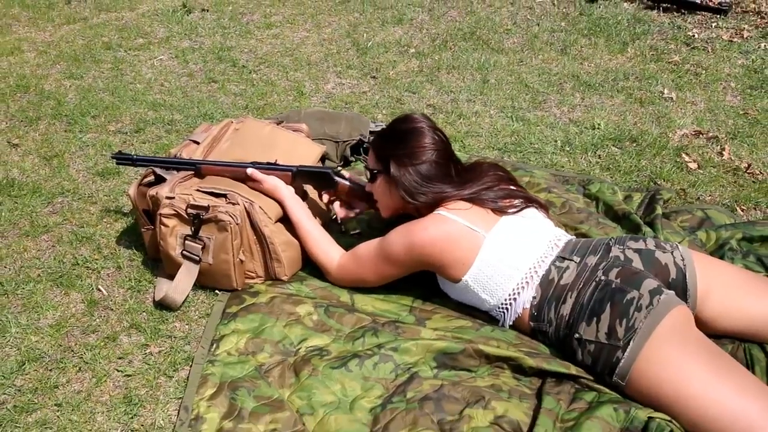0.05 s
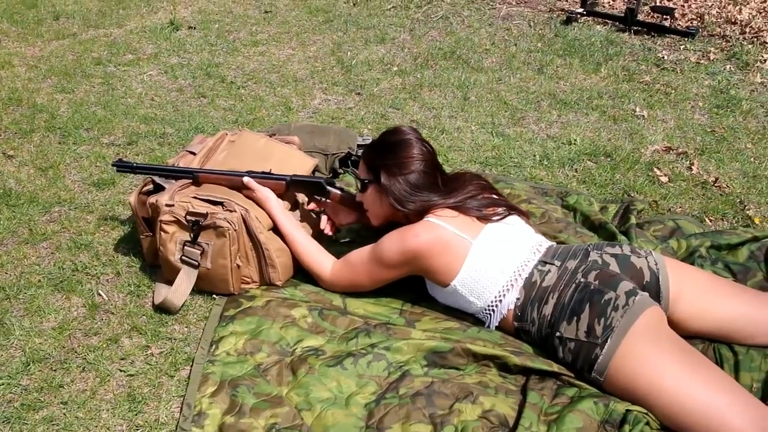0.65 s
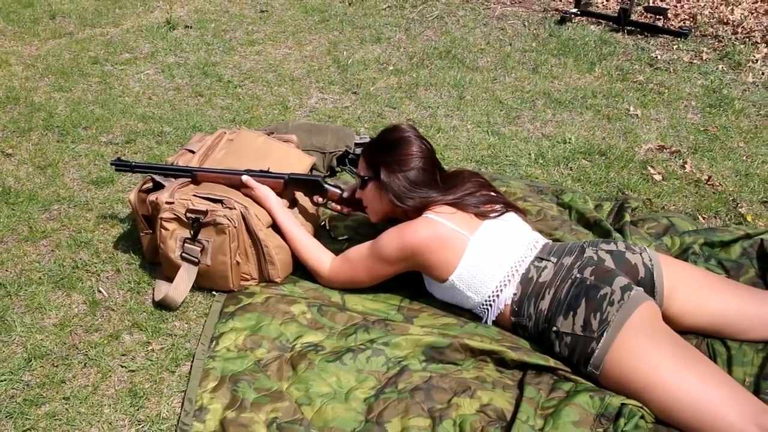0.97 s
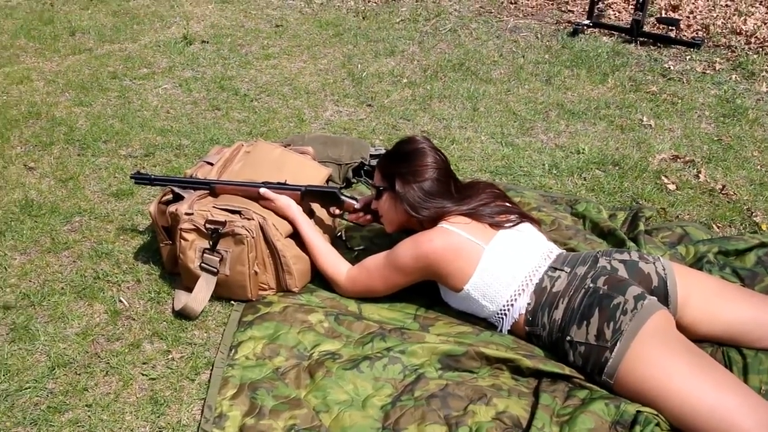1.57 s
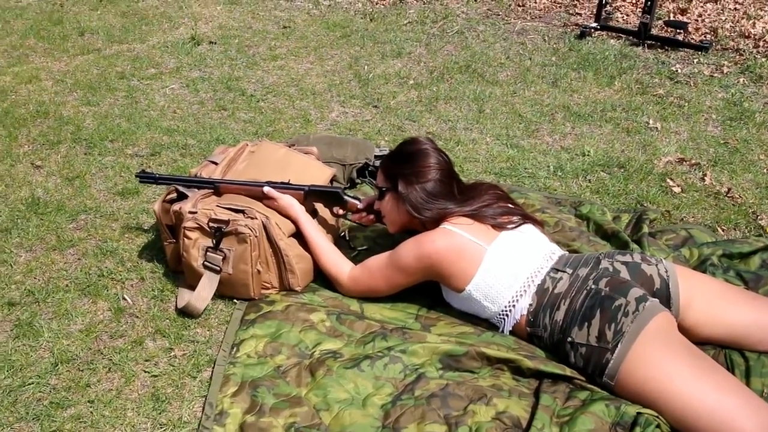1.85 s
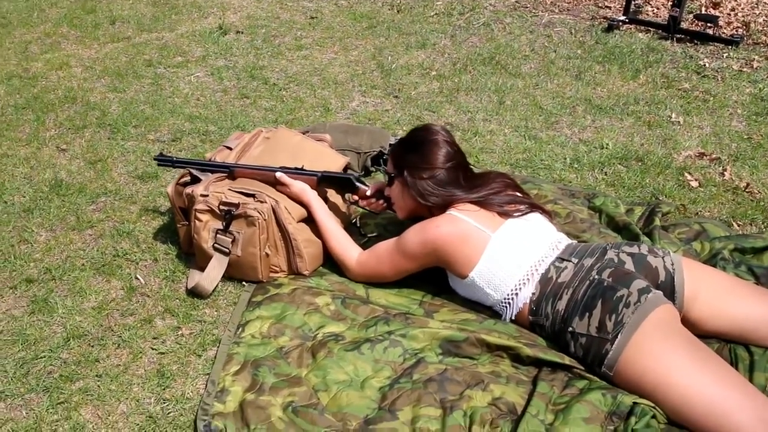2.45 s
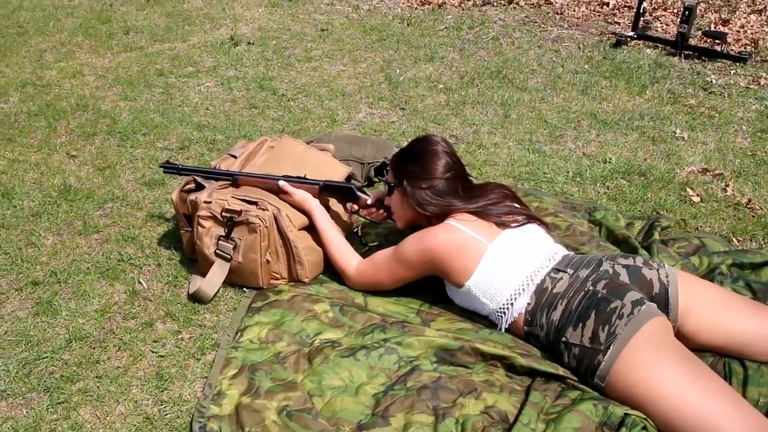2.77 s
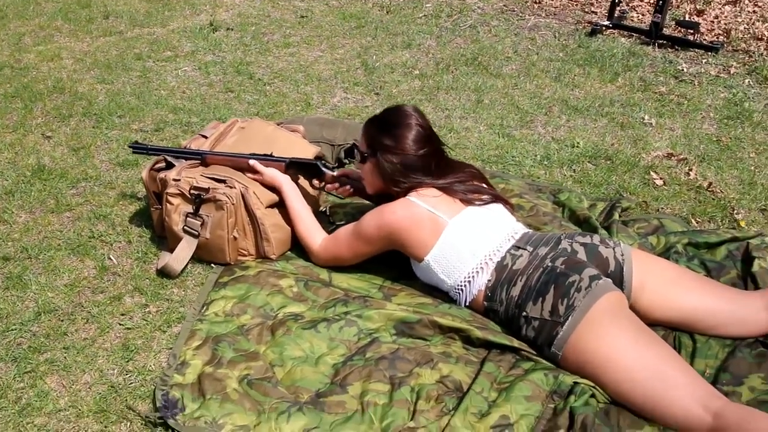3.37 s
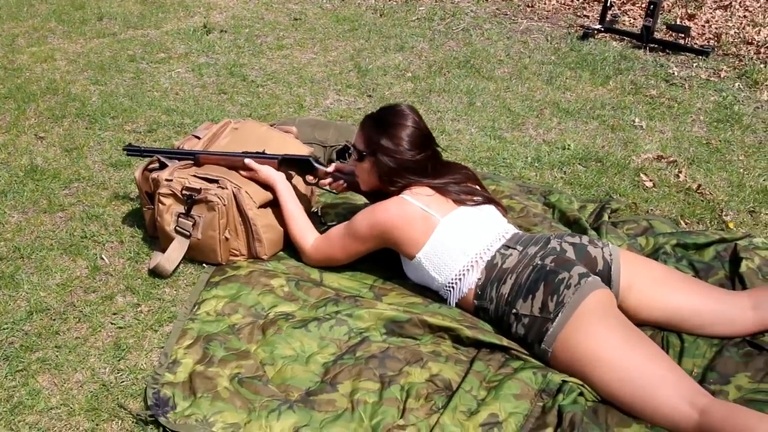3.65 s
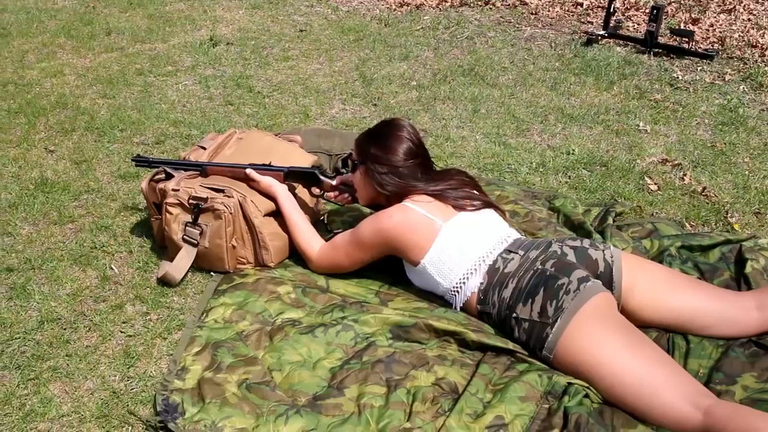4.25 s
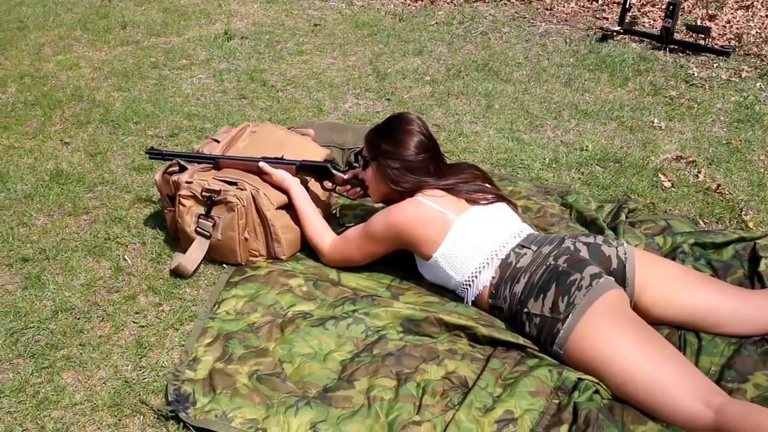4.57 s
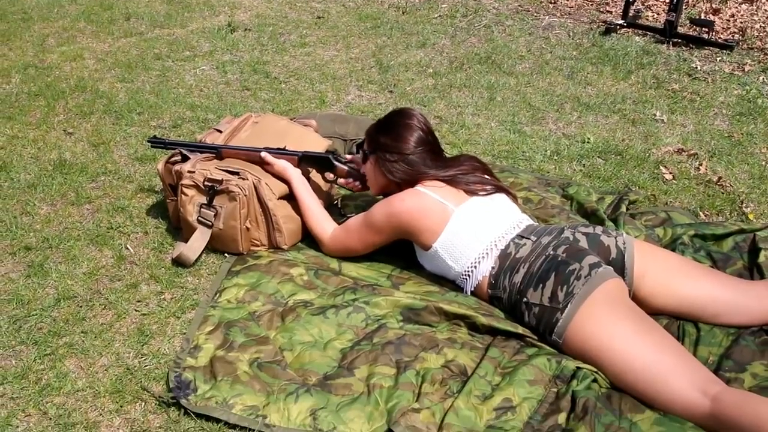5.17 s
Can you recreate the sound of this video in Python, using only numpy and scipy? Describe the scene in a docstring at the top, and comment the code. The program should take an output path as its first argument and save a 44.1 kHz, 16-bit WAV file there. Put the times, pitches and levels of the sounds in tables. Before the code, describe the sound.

Outdoors on an open field, two quick bursts of close steel clicking and sliding come as a rifle's lever is opened and closed, with the thin ring of an ejected casing. About a second later the rifle fires once, a sharp, slightly distorted blast followed by a rolling echo. Then only light handling, quiet outdoor air and a far engine's low hum are heard.

```python
"""First come the steel clacks of a lever-action rifle being worked close by, and the ping of its spent case.
Then one shot cracks across an open lawn. The blast overloads the microphone; a limiter turns the level
down and slowly back up while the echo rolls in from the trees, ever duller.
Behind it all, a far engine hums under the outdoor air, and a ground sheet rustles now and then."""
import sys
import numpy as np
from scipy import signal
from scipy.fft import rfft, irfft
from scipy.io import wavfile
from scipy.ndimage import uniform_filter1d

SR = 44100
rng = np.random.default_rng(int(sys.argv[2]) if len(sys.argv) > 2 else 0)


def dump(signal):
    """Clip the signal to [-1, 1] and save it as 16-bit WAV at the path in sys.argv[1]."""
    limited = np.clip(np.atleast_2d(signal).T, -1, 1)
    pcm = np.round(limited * 32767).astype(np.int16)
    wavfile.write(sys.argv[1], SR, pcm)


N = 229716
T = np.arange(N) / SR
FREQS = np.fft.rfftfreq(N, 1 / SR)
SHOT_S = 2.0662


def amp(db):
    """Turns decibels into a gain."""
    return 10 ** (np.asarray(db) / 20)


def unit(x):
    """Scales a signal to an average (rms) level of 1."""
    return x / np.sqrt(np.mean(x ** 2) + 1e-20)


def tone_curve(points):
    """Joins points of Hz and dB into a gain for every frequency."""
    hz, db = np.transpose(points)
    return amp(np.interp(np.log(FREQS + 1), np.log(hz + 1), db))


def band(x, lo_hz, hi_hz, order=2):
    """Keeps the sound between two frequencies."""
    return signal.sosfilt(signal.butter(order, [lo_hz, hi_hz], "band", fs=SR, output="sos"), x)


def noise(gains):
    """Noise shaped by a gain for every frequency."""
    return unit(irfft(rfft(rng.standard_normal(N)) * gains, N))


def drift(rate_hz):
    """Smooth random wandering."""
    return noise(np.exp(-(FREQS / rate_hz) ** 2))


def bell(t, middle, width):
    """A smooth rise and fall of height 1."""
    return np.exp(-.5 * ((t - middle) / width) ** 2)


def swell(s, width, db, hz, octaves):
    """Noise around one pitch that fades in and out."""
    return amp(db) * bell(T, s, width) * noise(bell(np.log2((FREQS + 1) / hz), 0, octaves))


def add(mix, s, sound):
    """Mixes a sound in at s seconds."""
    part = mix[round(s * SR):][:len(sound)]
    part += sound[:len(part)]


# The tone of the air and hiss. Each row: frequency in Hz, relative level in dB.
AIR_TONE = [(12, -43), (20, -2), (38, -8.5), (127, -4), (204, -14.5), (241, -13.5), (293, -16), (357, -20),
            (698, -21.5), (1000, -19.5), (1190, -24), (2260, -31), (5530, -36), (14700, -36), (16000, -46)]

def outdoor_air(level_db=-47.5, swell_db=0.67, hiss_hz=3600):
    """Low down, the air is alike left and right; higher up, each microphone side adds its own hiss."""
    alike = 1 / (1 + (FREQS / hiss_hz) ** 3)
    spectra = rfft(rng.standard_normal((2, N))) * tone_curve(AIR_TONE)
    mid, side = spectra * np.sqrt([1 + alike, 1 - alike])
    return amp(level_db + swell_db * drift(2)) * unit(irfft([mid + side, mid - side], N))


# The main exhaust tone. Each row: time in seconds, level in dB.
EXHAUST_LEVELS = [(0, -41), (0.7, -40.5), (1.0, -48.5), (2.0, -44), (3.0, -48), (3.7, -46.5), (4.0, -52.5),
                  (4.68, -50), (4.95, -38.5), (5.21, -45)]
# The engine's fainter, fluttering tones. Each row: multiple of its cycle rate, level in dB.
ENGINE_TONES = [(4, -54), (5, -59.5), (8, -63.5), (12, -65), (18, -67), (24, -70.5), (48, -67)]

def far_engine(start_hz=20.27, steady_hz=20.77, settle_s=1.1, waver=0.0041, flutter_db=4.5):
    """An engine settles to a steady speed; its low tones waver on their way through the air."""
    cycle_hz = steady_hz + (start_hz - steady_hz) * np.exp(-T / settle_s)
    phase = 2 * np.pi * np.cumsum(cycle_hz * (1 + waver * drift(5.5))) / SR
    main_db = np.interp(T, *np.transpose(EXHAUST_LEVELS)) + 1.2 * drift(8)
    others = sum(amp(db + flutter_db * drift(4.3)) * np.sin(multiple * phase + drift(4))
                 for multiple, db in ENGINE_TONES)
    return np.sqrt(2) * (amp(main_db) * np.sin(6 * phase) + others)


# Cloth and ground sheet. Each row: middle and width in seconds, level in dB, pitch in Hz.
CLOTH_RUSTLES = [(0.62, 0.11, -60, 2610), (1.346, 0.2, -57, 1010), (1.422, 0.009, -47, 1080),
                 (1.922, 0.063, -57.5, 3300), (3.583, 0.042, -54, 4700), (3.715, 0.034, -54, 5170)]
# Soft low thumps, mostly bumps on the microphone.
# Each row: middle and width in seconds, level in dB, pitch in Hz.
LOW_BUMPS = [(0.277, 0.0089, -29, 190), (1.03, 0.033, -46, 36), (4.055, 0.028, -37, 49.5)]
# Fingers and clothing touch the rifle. Each row: time in seconds, level in dB, pitch in Hz.
FINGER_TAPS = [(0.435, -38.5, 823), (1.852, -52, 4460), (1.899, -44.5, 2440), (3.3, -56.5, 5000),
               (3.397, -49.5, 4500), (3.447, -53, 4500), (4.461, -51, 2000), (4.78, -51, 1600)]

def handling(crinkle_db=1.5, tap_s=0.0024):
    """Cloth crinkles, the microphone is bumped and fingers tap the rifle."""
    cloth = sum(swell(*row, octaves=0.87) for row in CLOTH_RUSTLES)
    bumps = sum(swell(*row, octaves=0.51) for row in LOW_BUMPS)
    taps = sum(swell(s, tap_s, db, hz, octaves=0.68) for s, db, hz in FINGER_TAPS)
    return cloth * unit(amp(crinkle_db * drift(60))) + bumps + taps


# A small loose part. Each row: pitch in Hz, level in dB, seconds to fade by 60 dB.
TINK_TONES = [(3080, -36.5, 0.018), (4330, -40, 0.022), (4800, -42, 0.018)]

def tink(start_s=4.018):
    """One light touch of metal on metal."""
    t = np.maximum(T - start_s, 0)
    return sum(amp(db - 60 * t / fade_s) * np.sin(2 * np.pi * hz * t) for hz, db, fade_s in TINK_TONES)


# The brass case's tones. Each row: pitch in Hz, relative level in dB, seconds to fade by 60 dB.
CASE_TONES = [(5420, 1, 0.33), (12730, -6, 0.18), (12828, -2.5, .19), (15722, 2.5, .15)]
# The case flies out and lands. Each row: start in seconds, level in dB,
# extra dB for the two middle tones, extra dB for the top tone.
CASE_HITS = [(0.283, -32, -11, 0), (0.3065, -30.5, -15, -5), (0.899, -34.5, 3, -11),
             (0.917, -50.5, 21, -10)]

def spent_case(rise_s=0.0038, spin_hz=38, spin_depth=0.24):
    """The thin tube rings and wavers as it tumbles; where it is struck decides which tones ring."""
    out, t = np.zeros(N), T[:SR // 2]
    tumble = (1 - np.exp(-t / rise_s)) * (1 - spin_depth * np.cos(2 * np.pi * spin_hz * t))
    for s, db, middle_db, top_db in CASE_HITS:
        for (hz, tone_db, fade_s), extra_db in zip(CASE_TONES, (0, middle_db, middle_db, top_db)):
            fade = amp(db + tone_db + extra_db - 60 * t / fade_s)
            add(out, s, tumble * fade * np.sin(2 * np.pi * hz * t))
    return out


# The bolt slides. Each row: middle and width in seconds, scrape level in dB, rattle level in dB.
BOLT_SLIDES = [(0.143, .003, -33.5, -25.5), (0.217, 0.032, -47, -34), (0.283, 0.017, -35.5, -19.5),
               (0.6, 0.028, -42.5, -27.5), (0.667, 0.011, -39.5, -26.5), (0.743, 0.015, -52, -48)]

def scrape_strength(grain_db=5):
    """The bolt catches and slips along its rails."""
    sliding = sum(amp(db) * bell(T, s, width) for s, width, db, _ in BOLT_SLIDES)
    return sliding * unit(amp(grain_db * drift(250)))


def rattle_knocks(per_second=140, spread_db=5, thud_db=-11, treble_db=-6):
    """Lists the small, uneven knocks of loose parts shaken by the sliding bolt."""
    jitter, chance = rng.standard_normal((2, 400))
    times = np.maximum(np.arange(len(jitter)) + .25 * jitter, 0) / per_second
    strength = sum(amp(db) * bell(times, s, width) for s, width, _, db in BOLT_SLIDES)
    levels = 20 * np.log10(strength + 1e-9) + spread_db * chance
    return [(s, db, thud_db, treble_db) for s, db in zip(times, levels) if db > -55]


# Lever, bolt and hammer strike. Each row: time in seconds, level in dB,
# extra dB for the low thud, extra dB for the treble.
MAIN_KNOCKS = [(0.1362, -21, -17, 11), (0.148, -14, -6.5, 8.5), (0.1523, -4.5, -13, -4.5),
               (0.1867, -21, -24, 3), (0.1945, -25.5, -24, -13), (0.231, -21.5, -20, -6),
               (0.2627, -16, -22, 5), (0.27, -11.5, -7.5, -6), (0.299, -14.5, -20.5, -11),
               (0.3056, -20, -24, 10), (0.3599, -21, -1, 1), (0.377, -25.5, -0.5, -20),
               (0.5316, -20, -21, -13.5), (0.563, -27, -11, -18.5), (0.582, -16.5, -11, -11.5),
               (0.6135, -22, -22.5, -10), (0.6201, -17, -19, -2.5), (0.654, -25.5, -11, -2.5),
               (0.659, -16, -20, -20), (0.6722, -11, -20, -21.5), (0.707, -34.5, -21, 12),
               (0.7198, -10.5, -16, -7), (0.7997, -8, -25, -4), (0.809, -11, -9, -1.5),
               (0.8158, -7.5, -20.5, -6), (0.826, -4, -13, -1), (0.8383, -4, -25.5, -1),
               (0.8985, -38, -18, 4), (0.916, -35, -16, -2), (2.0578, -19, -5.5, 1)]

def steel_chatter(rise_s=0.00065, decay_s=.0021, lead_in_s=0.0018, rebound_s=0.0057):
    """Steel parts scrape for a moment, strike, then bounce once, weaker and duller."""
    power = np.outer([0, 1, amp(-9)], scrape_strength()) ** 2  # low, middle and high bands
    early_s = .015  # room for the scrape before each strike
    t = T[:SR // 16] - early_s
    after = np.maximum(t, 0)
    strike = (1 - np.exp(-after / rise_s)) * np.exp(-after / decay_s)
    blow = strike + amp(-16) * np.exp(-abs(t) / lead_in_s)
    rebounds = [(s + rebound_s, db - 13, thud, treble - 6) for s, db, thud, treble in MAIN_KNOCKS]
    for s, db, thud_db, treble_db in MAIN_KNOCKS + rebounds + rattle_knocks():
        for track, extra_db in zip(power, (thud_db, 0, treble_db)):
            add(track, s - early_s, (amp(db + extra_db) * blow) ** 2)
    thud, clack, tick = np.sqrt(power) * rng.standard_normal((3, N))
    return (amp(12.5) * band(thud, 280, 1000)
            + amp(10) * band(clack, 1200, 4120, order=3)
            + amp(4.5) * band(tick, 5500, 14000))


# The rifle's steel body. Each row: pitch in Hz, width in Hz (wider dies sooner), relative level in dB.
STEEL_TONES = [(780, 133, -1.5), (1190, 120, -9.5), (1540, 54, -9.5), (1930, 83, -6.5), (2260, 190, -7.5),
               (2560, 92, -3), (3054, 190, -3), (3660, 370, -5), (5760, 150, -0.5), (6630, 120, -6.5),
               (7400, 15, -5.5), (7900, 45, -7.5), (9400, 199, -10), (10500, 80, -8.5), (11920, 140, -13.5),
               (14400, 180, -12)]

def lever_action(ring_db=2, direct_db=-4, tail_db=-31, tail_s=0.67):
    """The chatter rings the rifle's body; the lawn and nearby things scatter a little back."""
    t = T[:SR // 16]
    chatter = steel_chatter()
    ring = sum(amp(db) * 2 * np.pi * width / SR * np.exp(-np.pi * width * t) * np.cos(2 * np.pi * hz * t)
               for hz, width, db in STEEL_TONES)
    near = amp(direct_db) * chatter + amp(ring_db) * signal.oaconvolve(chatter, ring)[:N]
    scatter = band(rng.standard_normal(SR) * amp(-60 * T[:SR] / tail_s), 900, 4200, order=1)
    return near + amp(tail_db) * signal.oaconvolve(near, scatter / np.linalg.norm(scatter))[:N]


# The blast bounces off nearby things. Each row: arrival in seconds, peak level in dB.
NEAR_ECHOES = [(2.093, 5), (2.0988, 4), (2.1079, 7), (2.1108, 5.5), (2.121, 8), (2.13, 4.5), (2.15, 5),
               (2.181, 2)]

def slaps(width_s=.00006, early_s=.01):
    """Each nearby echo is one push and one pull of the air."""
    out = np.zeros(N)
    u = (T[:SR // 50] - early_s) / width_s
    for s, db in NEAR_ECHOES:
        add(out, s - early_s, -amp(db) * u * np.exp(.5 - .5 * u ** 2))
    return out


# Groups of trees throw the blast back. Each row: arrival and spread in seconds, relative level in dB.
TREE_ECHOES = [(2.1, 0.029, -10.5), (2.224, 0.013, -7), (2.28, 0.018, -5), (2.423, 0.03, -8),
               (2.56, 0.064, -12), (2.72, 0.073, -19.5)]

def echo_strength(first_s=.012, tree_line_s=.14, field_edge_s=0.49, fall_power=5.05):
    """The ground's echo dies away beyond the field's edge, and each group of trees adds a swell."""
    travel = np.maximum(T - SHOT_S, 0)
    ground_db = -13.5 - 1.5 * (travel < tree_line_s)  # the open lawn returns less
    ground = amp(ground_db) ** 2 / (1 + (travel / field_edge_s) ** fall_power)
    trees = sum((amp(db) * bell(T, s, spread)) ** 2 for s, spread, db in TREE_ECHOES)
    return (travel > first_s) * np.sqrt(ground + trees)


def air_dulling(sound, air_db=1.8, air_power=1.708, leaves_db=0.5, patchy_db=0.5):
    """The longer an echo travels, the more treble the air takes; leaves give a little back."""
    hz, t, spectrum = signal.stft(sound, SR, nperseg=512, noverlap=384)
    khz, travel = hz[:, None] / 1000, np.maximum(t - SHOT_S, 0)
    patches = uniform_filter1d(rng.standard_normal(spectrum.shape), 8, axis=0)
    patches = unit(uniform_filter1d(patches, 10, axis=1))  # uneven over both pitch and time
    loss_db = travel * air_db * khz ** air_power - leaves_db * np.minimum(travel, 1) * np.log2(1 + khz)
    spectrum *= amp(patchy_db * patches - loss_db)
    return signal.istft(spectrum, SR, nperseg=512, noverlap=384)[1][:N]


# The echo's tone before the air dulls it. Each row: frequency in Hz, relative level in dB.
ECHO_TONE = [(30, -43.5), (70, -14), (115, -4.5), (220, -1.5), (400, 3), (650, -2.5), (1300, 1.5),
             (2100, -4), (3600, -2.5), (5200, -11.5), (9000, -17.5), (16000, -22.5)]

def echo(roll_db=2):
    """A few strong echoes and countless faint ones blend into a long roll."""
    # the first echoes come one by one, the later ones crowd together
    sparse_db = 1.2 + 4.5 * np.exp(-np.maximum(T - SHOT_S, 0) / .1)
    size = amp(sparse_db * drift(450))
    grains = rng.standard_normal(N) * size / np.sqrt(uniform_filter1d(size ** 2, size=1200))
    roll = unit(irfft(rfft(grains) * tone_curve(ECHO_TONE), N))
    boom = swell(s=2.44, width=0.0075, db=-4, hz=257, octaves=0.78)  # one large, far surface answers
    return air_dulling(slaps() + boom + roll * amp(roll_db) * echo_strength())


def thump(start_s=2.07, start_hz=100, end_hz=16, sag_s=0.011, decay_s=0.0047, linger_s=0.031):
    """The low swing of pressure after the blast starts with suction and slows as it dies."""
    t = np.maximum(T - start_s, 0)
    turns = end_hz * t + (start_hz - end_hz) * sag_s * (1 - np.exp(-t / sag_s))
    fade = amp(8) * np.exp(-t / decay_s) + amp(-1) * np.exp(-t / linger_s)
    return -np.sin(2 * np.pi * turns) * fade


def shock(start_s, push_s, db):
    """A blast wave: a sudden push of air, then a longer suction."""
    u = np.maximum(T - start_s, 0) / push_s
    return amp(db) * (T >= start_s) * (1 - u) * np.exp(-u)


def blast(gas_db=35, gas_decay_s=0.0015, crack_db=16, crack_decay_s=0.0022, bounce_s=0.0053):
    """A shock leaves the barrel with swirling gas and a sharp crack, then bounces off the ground."""
    t = np.maximum(T - SHOT_S, 0)
    gas = unit(band(rng.standard_normal(N), 243, 2135)) * np.exp(-t / gas_decay_s)
    crack = unit(band(rng.standard_normal(N), 2500, 13000)) * np.exp(-t / crack_decay_s)
    shocks = shock(SHOT_S, push_s=0.0003, db=24) + shock(SHOT_S + bounce_s, push_s=0.0015, db=19)
    return shocks + (t > 0) * (amp(gas_db) * gas + amp(crack_db) * crack)


def stereo(x):
    """The microphone's left side hears a hair earlier and louder than its right."""
    side = amp(-39) * np.gradient(x) + amp(-54) * x
    return np.array([x + side, x - side])


def scene():
    """The rifle, its echo and the field around it."""
    rifle = lever_action() + spent_case() + tink() + blast() + thump()
    return stereo(rifle + echo() + far_engine() + handling()) + outdoor_air()


def record(dry, overload_db=14, recovery_db_per_s=15, top_hz=16100):
    """The microphone overloads, a limiter ducks at once and recovers steadily, and top treble is cut."""
    clipped = np.clip(dry, -amp(overload_db), amp(overload_db))
    power = abs(uniform_filter1d((clipped ** 2).mean(0), size=48))
    over_db = 10 * np.log10(np.maximum(power, 1))
    duck_db = np.maximum.accumulate(over_db + recovery_db_per_s * T) - recovery_db_per_s * T
    limited = np.clip(clipped * amp(-duck_db), -.95, .95)
    lowpass = signal.firwin(511, top_hz, window=("kaiser", 9), fs=SR)
    return signal.oaconvolve(limited, lowpass[None], "same")


dry = scene()
out = record(dry)
dump(out)
```